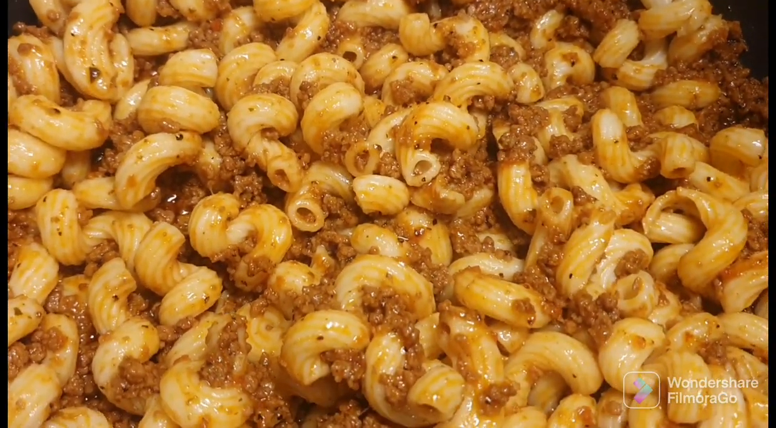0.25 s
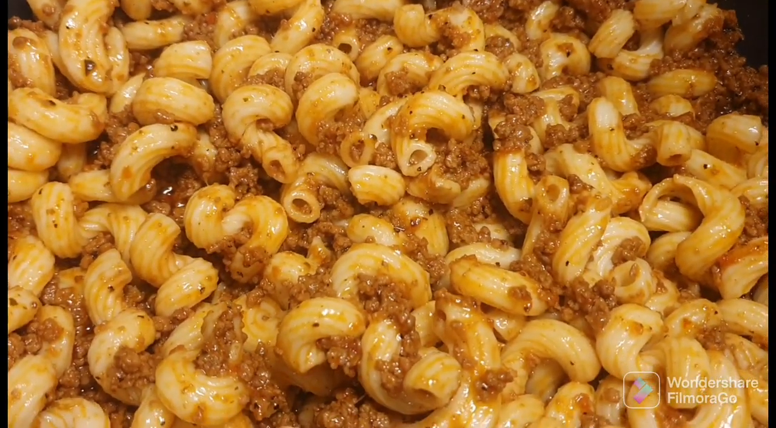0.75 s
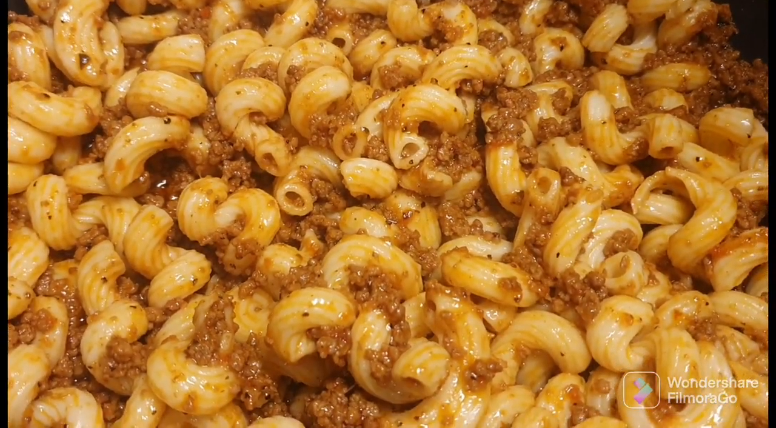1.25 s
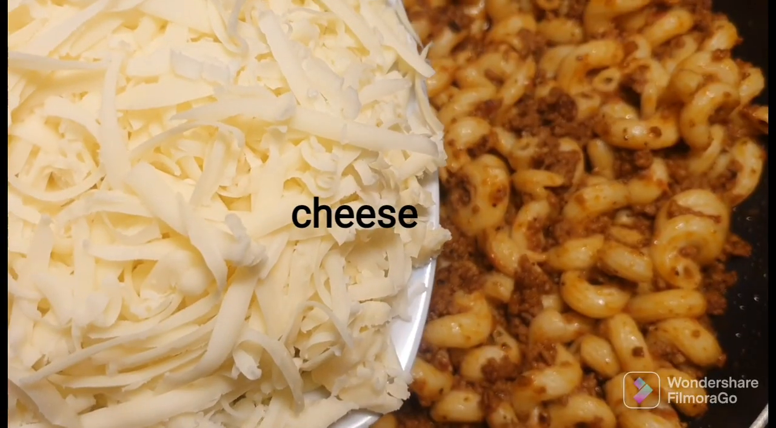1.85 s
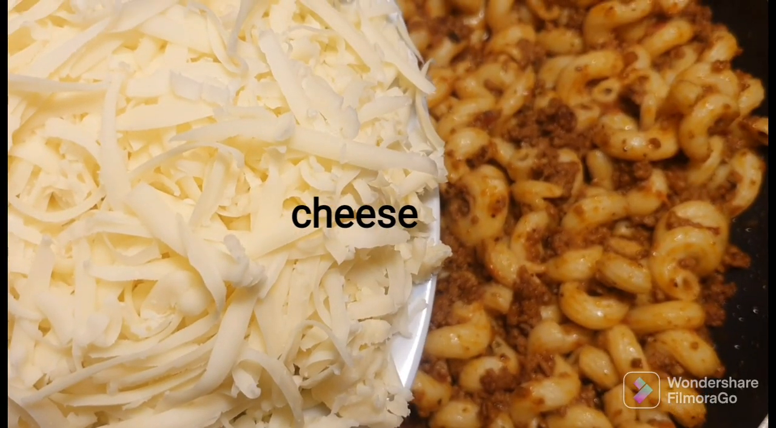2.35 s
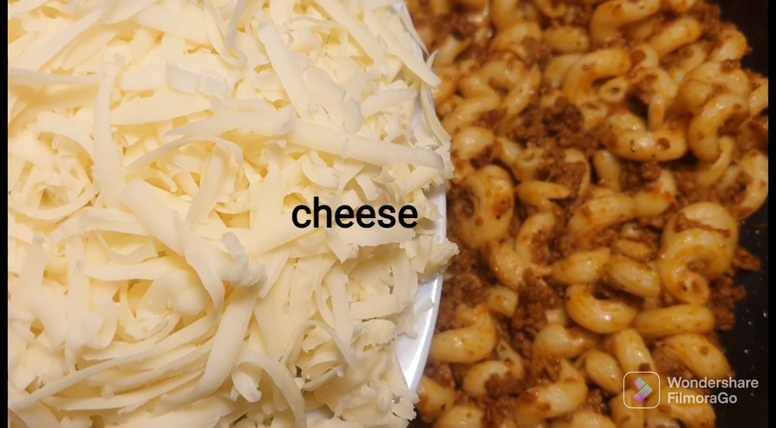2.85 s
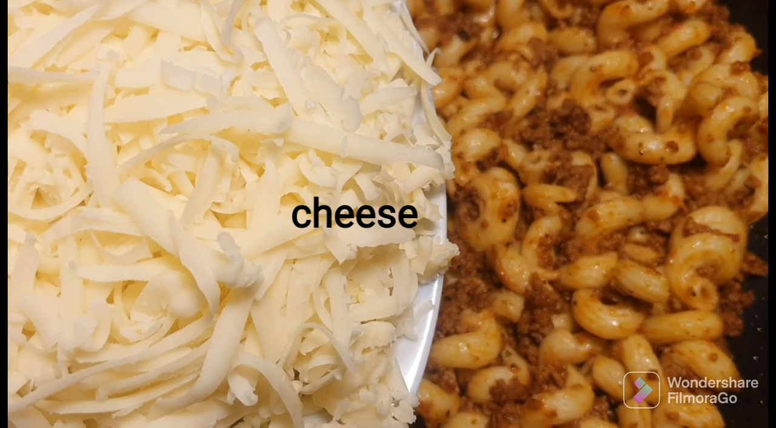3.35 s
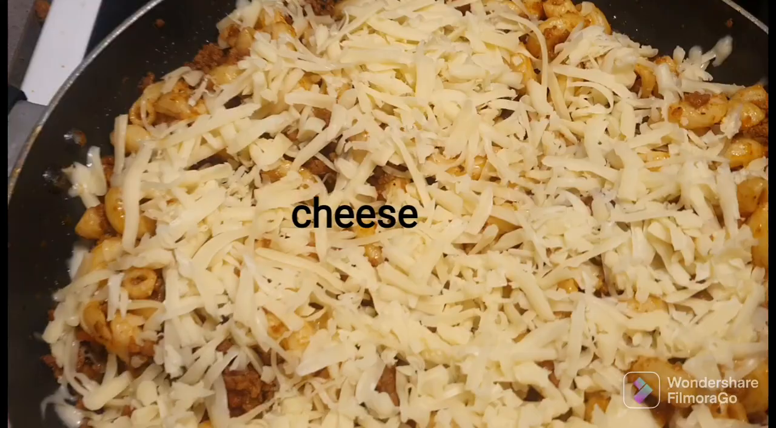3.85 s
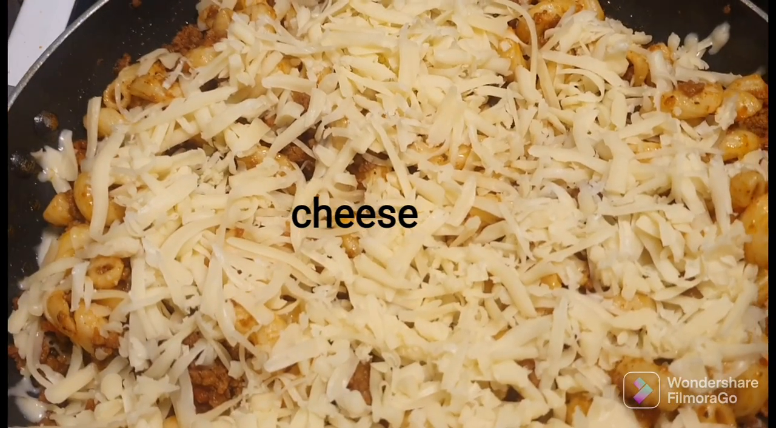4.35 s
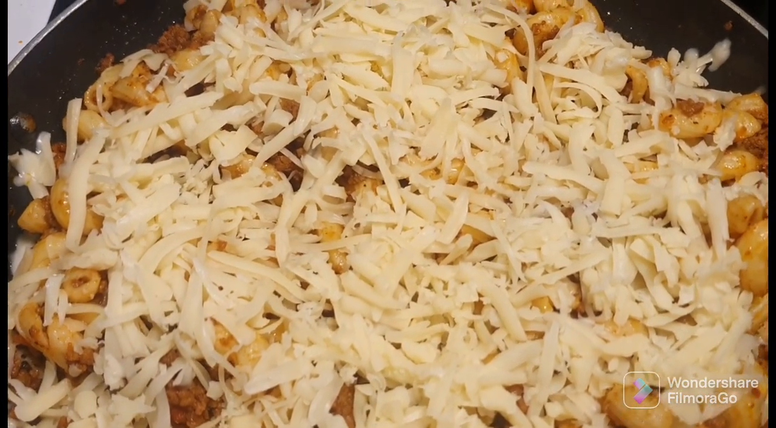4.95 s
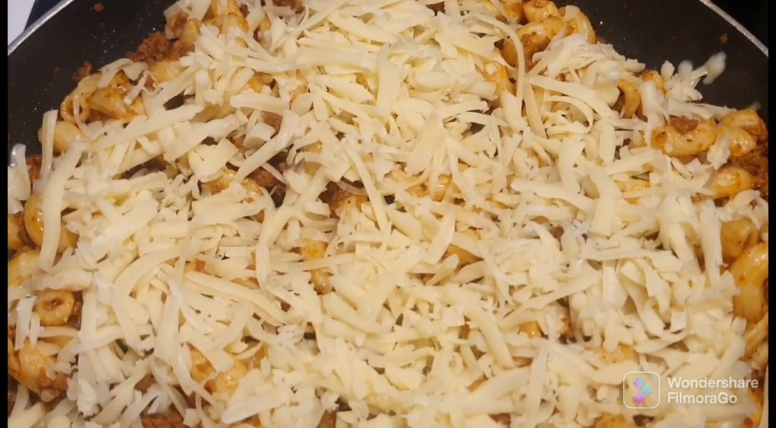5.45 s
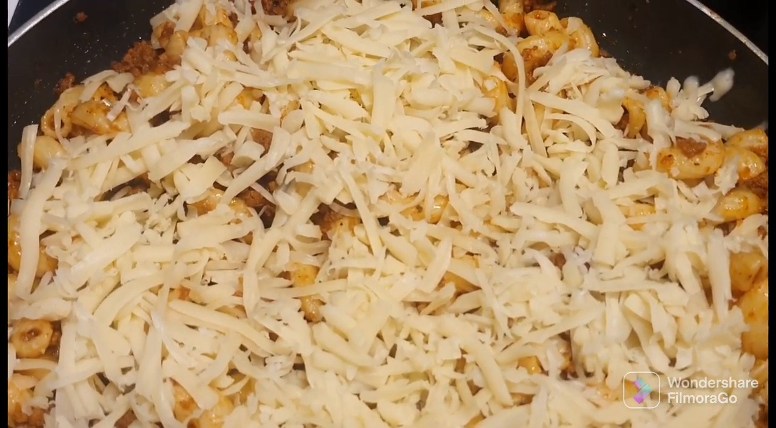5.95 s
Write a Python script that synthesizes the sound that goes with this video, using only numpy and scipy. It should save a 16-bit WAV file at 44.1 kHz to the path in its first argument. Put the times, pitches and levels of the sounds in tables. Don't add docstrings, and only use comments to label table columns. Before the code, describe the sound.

A soft, low traffic rumble with airy hiss continues throughout, with a barely noticeable slow bump about four times a second. A buzzy sparrow chirp sounds at 0.4 s and a fainter one at 0.9. From 1.3 to 2.3 s a bird whistles clear, nearly pure phrases: a low arch, a leap and fall, a short drop, a dip and return. It adds brief throbbing warbles at 2.4, 2.9 and 3.4 s. Falling sparrow chirps recur near 1.4, 2.0, 2.9, 3.5, 4.3, 5.4 and 6.0 s, ringing off outdoor walls. Nearby in a small room, a loud dry double knock hits a full, damped pan at 1.5 s, with a soft thump, then lighter clacks and scraping to 2.2 s. A tiny scuff comes at 4.2 s, a sharp clack at 4.65, and faint taps and a scrape around 5.6 to 6.0 s.

```python
import sys
import numpy as np
from scipy import signal
from scipy.io import wavfile

SR = 44100
rng = np.random.default_rng(int(sys.argv[2]) if len(sys.argv) > 2 else 0)


def wav_out(sig):
    wavfile.write(sys.argv[1], SR, np.round(np.clip(np.atleast_2d(sig).T, -1, 1) * 32767).astype(np.int16))


def ratio_of_db(decibels):
    return 10 ** (np.asarray(decibels, float) / 20)


N = 272979

# f/Hz, density level/dB
FLOOR_SPECTRUM = [(12, -30), (20, -11.5), (44, -3.5), (101, -8.5), (202, -6.5), (667, -15), (881, -16),
                  (2270, -23.5), (3960, -22), (4680, -25), (8640, -48.5), (10200, -49), (11400, -67),
                  (13500, -82), (15500, -74.5)]
# f/Hz, correlation/1
FLOOR_LIKENESS = [(30, 0.74), (180, 0.73), (550, 0.33), (1650, 0.057), (5000, 0.18), (12000, 0.18)]
# t/s, engine rumble level/dB, far chatter level/dB
FLOOR_SWELLS = [(0, 2.5, -9), (1.2, 3, -9.5), (1.598, 5, 2.5), (2.599, 5.5, -2.5), (3.8, 5, 1),
                (4.399, 3, -1), (5.199, 4.5, -2), (6.19, 3.5, -5)]
# start t/s, length/s, top f/Hz, end f/Hz, level/dB
CHIRPS = [(1.387, 0.091, 4514, 3200, -47.5), (2.014, .12, 4710, 3200, -48),
          (2.905, 0.087, 5000, 2917, -47.5), (3.539, 0.12, 4247, 3295, -47),
          (5.433, 0.087, 5000, 2936, -48), (6.038, 0.1, 4297, 2970, -48)]
# start t/s, length/s, top f/Hz, end f/Hz, level/dB
BROAD_CHIRPS = [
    (0.376, .082, 5360, 4380, -53),
    (0.858, .085, 4690, 4010, -64.5),
    (4.276, 0.091, 4904, 3856, -50.5),
]
# start t/s, length/s, from f/Hz, to f/Hz, level/dB
FAINT_CHIRPS = [(.17, .13, 4650, 3820, -77), (2.52, 0.058, 4290, 3260, -60), (2.7, 0.092, 3730, 3280, -63),
                (2.805, .03, 5520, 4350, -60), (3.15, 0.23, 3020, 3240, -72), (4.83, .035, 3330, 3490, -63),
                (4.945, 0.027, 4420, 4700, -65), (4.995, 0.054, 3610, 3450, -66),
                (5.29, 0.034, 4820, 4740, -72)]
# multiple/1, level/dB
CHIRP_OVERTONES = [(2, -30.5), (3, -38)]
# start t/s, length/s, from f/Hz, to f/Hz, level/dB
FAR_NOTES = [(1.04, 0.064, 1720, 1644, -64), (1.11, 0.024, 1860, 2050, -60), (1.135, 0.1, 2080, 2120, -55),
             (1.76, .045, 2340, 2750, -45), (1.495, 0.03, 1845, 1816, -44.5),
             (1.875, 0.049, 2750, 3100, -54.5), (3.0, .12, 546, 554, -63), (3.42, 0.33, 532, 518, -59.5),
             (3.83, .22, 1282, 1272, -72)]
# t/s, f/Hz, level/dB
WHISTLED_PHRASES = [
    [(1.268, 1720, -52.5), (1.3, 1834, -44.5), (1.32, 1920, -32.5), (1.35, 1964, -29.5), (1.378, 1981, -32),
     (1.41, 1941, -31.5), (1.435, 1868, -35), (1.495, 1770, -40.5)],
    [(1.655, 2090, -39), (1.672, 2610, -47), (1.69, 2757, -39.5), (1.72, 2574, -33), (1.745, 2370, -37.5),
     (1.765, 2223, -39.5)],
    [(1.885, 2010, -54), (1.905, 2115, -36), (1.94, 2094, -32.5), (1.952, 1805, -37), (1.962, 1610, -51)],
    [(2.04, 2585, -43), (2.115, 2510, -38), (2.14, 2470, -39.5), (2.165, 2370, -37), (2.213, 2070, -36),
     (2.225, 2180, -41), (2.25, 2431, -35.5), (2.285, 2603, -39), (2.33, 2520, -44)],
]
# multiple/1, level/dB
WHISTLE_OVERTONES = [(3, -37.5), (4, -45.5), (5, -46), (6, -55.5), (7, -60.5)]
# start t/s, last throb t/s, f/Hz, level/dB, throb period/s
WARBLED_NOTES = [
    (2.418, 2.523, 1942, -33, 0.025),
    (2.854, 2.944, 1940, -37, 0.0269),
    (3.376, 3.55, 1970, -35, 0.01904),
]
# t/s, f/Hz, level/dB
WARBLE_UPBEAT = [(3.305, 1732, -63), (3.325, 1745, -46.5), (3.345, 2290, -44.5), (3.375, 2600, -47),
                 (3.4, 2030, -28.5)]
# start t/s, length/s, from f/Hz, to f/Hz, level/dB
HOARSE_CHIPS = [(1.6, 0.03, 3215, 1880, -43.5), (2.25, 0.12, 1504, 1785, -56),
                (2.37, 0.047, 2750, 2920, -48.5), (2.815, 0.053, 2720, 2670, -52.5),
                (3.17, 0.1, 2210, 2100, -61), (3.62, 0.016, 2910, 2470, -51.5),
                (3.665, .015, 2810, 2370, -48.5), (3.715, 0.01, 2610, 2400, -43.5),
                (3.765, 0.016, 3090, 2720, -51), (4.078, 0.016, 3180, 2180, -47.5)]
# t/s, peak level/dB, brightness level/dB, left-right difference/dB
KNOCKS = [(1.526, -19.5, -18, 5), (1.549, -20, -47, 1), (1.608, -37, -43, 6.5), (1.737, -33.5, 5, 11),
          (1.964, -33, -26, 1.5), (2.055, -30.5, 3, -3), (2.079, -34, -38, 0.5), (2.139, -31, 7.5, -5.5),
          (2.195, -36.5, 0.5, -15.5), (2.464, -47, -18, 5.5), (3.358, -38, 5, 2), (4.174, -37, -73, -16),
          (4.221, -41, 4.5, -7), (4.607, -31, -3.5, 19), (4.651, -21.5, -9, 11), (4.67, -49, -33, 23),
          (4.718, -48, 10.5, -20), (4.797, -62, 23, 20), (5.601, -45, -50, 2), (5.954, -44.5, 5.5, 20),
          (6.046, -41.5, -2, -8)]
# peak t/s, level/dB, rise/s, fall/s
SCRAPE_STROKES = [(1.519, -22, 0.0036, .013), (1.529, -44.5, 0.011, 0.71), (1.743, -43, 0.016, 0.038),
                  (1.981, -50.5, 0.055, 0.014), (2.083, -37, 0.079, 0.2), (2.475, -42.5, 0.074, 0.082),
                  (4.18, -48.5, 0.053, 0.13), (4.603, -30, 0.0059, 0.07), (4.656, -37, 0.058, 0.12),
                  (4.75, -49, 0.065, 0.21), (5.526, -50.5, .006, 0.23), (5.979, -40, 0.091, 0.03),
                  (6.03, -49.5, 0.036, .22)]
# f/Hz, 60 dB decay time/s, level/dB
PAN_MODES = [(216, 0.071, -3), (324.6, 0.23, -3), (362.7, 0.066, -6), (537, 0.061, -4), (583, 0.024, 6.5),
             (708, 0.1, 15), (762, 0.016, -8), (1207, 0.012, 11.5), (1375, 0.015, -2.5)]
# f/Hz, density level/dB
PAN_BODY = [(88, -66), (150, -10.5), (336, 1.5), (449, -2.5), (571, -20), (987, -4), (1170, -17),
            (1710, -27), (1890, -10.5), (4860, -20.5), (9000, -63.5), (11700, -88), (19800, -120)]
# t/s, peak level/dB
WORKTOP_THUMPS = [
    (1.599, -43),
    (2.061, -45.5),
]
# start t/s, length/s, from f/Hz, to f/Hz, level/dB
THIN_NOTE = [(2.56, 0.0513, 4890, 4530, -59)]
# multiple/1, level/dB
THIN_OVERTONES = [(2, -13), (3, -31)]
# t/s, f/Hz, level/dB
FALLING_NOTE = [(3.79, 8830, -76), (3.88, 7920, -72), (3.97, 7400, -67), (4.0, 6550, -55.5),
                (4.015, 5810, -70), (4.027, 5000, -52), (4.06, 2300, -74)]
# start t/s, length/s, from f/Hz, to f/Hz, level/dB
RISING_WHISPER = [(3.8, 0.26, 10950, 13600, -86)]


def rms_one(x):
    return x / np.sqrt(np.mean(x ** 2) + 1e-20)


def at_hz(points, hz):
    table_hz, value = np.array(points)[:, :2].T
    return np.interp(np.log(hz), np.log(table_hz), value)


def band(x, low_hz, high_hz):
    return signal.sosfilt(signal.butter(2, [low_hz, high_hz], "band", fs=SR, output="sos"), x)


def coloured(x, spectrum):
    edges = 100 * 2 ** np.arange(0, 7, .5)
    out = 0
    for k, (low, high) in enumerate(zip(edges, edges[1:])):
        out = out + ratio_of_db(at_hz(spectrum, np.sqrt(low * high))) * band(x, low, high) * (-1) ** k
    return out


def drift(rate_hz):
    r = np.exp(-2 * np.pi * rate_hz / SR)
    return rms_one(signal.lfilter([1], [1, -2 * r, r * r], rng.standard_normal(N + SR))[SR:])


def stereo(mid, side, alike):
    return np.sqrt(1 + alike) * mid + np.sqrt(1 - alike) * side * [[1], [-1]]


def add(out, s, sound, pan_db):
    i = int(s * SR)
    placed = sound * ratio_of_db(np.array([[.5], [-.5]]) * pan_db)
    out[:, i:i + len(sound)] += placed[:, :N - i]


def echoes(x, t60, gap_s, alike):
    t = np.arange(SR) / SR
    mid, side = rng.standard_normal((2, SR)) * ratio_of_db(-60 * t / t60) * (t > gap_s)
    tail = stereo(mid, side, alike)
    tail = tail / np.sqrt(np.sum(tail ** 2) / 2)
    return signal.fftconvolve(x.mean(axis=0)[None], tail, axes=1)[:, :N]


def sung(curves, shake, pan_db, shake_per_khz=0):
    return [[(s, hz, db, pan_db, shake + shake_per_khz * max(hz / 1000 - 2, 0)) for s, hz, db in curve]
            for curve in curves]


def glides(rows, shake, pan_db):
    edge_db = -5
    curves = []
    for s, length_s, from_hz, to_hz, db in rows:
        middle = (s + length_s / 2, (from_hz + to_hz) / 2, db)
        curves.append([(s, from_hz, db + edge_db), middle, (s + length_s, to_hz, db + edge_db)])
    return sung(curves, shake, pan_db)


def whistles(notes, overtones, warble_hz=90):
    out, unsteady = np.zeros((2, N)), drift(warble_hz)
    for note in notes:
        s, *columns = np.transpose(note)
        t = np.arange(s[0], s[-1], 1 / SR)
        hz, db, pan_db, shake = (np.interp(t, s, column) for column in columns)
        shaken_hz = hz * (1 + shake * unsteady[int(s[0] * SR):][:len(t)])
        phase = 2 * np.pi * np.cumsum(shaken_hz) / SR
        tone = np.sin(phase)
        for k, level_db in overtones:
            audible = (k * hz < SR / 2) * np.clip(k * hz / 2000 - 3, 0, 1)
            tone = tone + ratio_of_db(level_db) * np.sin(k * phase) * audible
        edges = np.clip(np.minimum(t - s[0], s[-1] - t) / 0.0028, 0, 1)
        add(out, s[0], np.sqrt(2) * tone * edges * ratio_of_db(db), pan_db)
    return out


def traffic_and_air():
    level_db, patchy_db = -51, 1.92
    out, together, edges = 0, drift(1.5), 20 * 2 ** np.arange(0, 10, .4)
    white, flicker = rng.standard_normal((2, 2, N)), drift(12.4)
    s, rumble_db, chatter_db = np.transpose(FLOOR_SWELLS)
    t = np.arange(N) / SR
    rumble_db, chatter_db = np.interp(t, s, rumble_db), np.interp(t, s, chatter_db)
    for k, (low, high) in enumerate(zip(edges, edges[1:])):
        mid, side = band(white[k % 2], low, high)
        hz = np.sqrt(low * high)
        alike = np.clip(at_hz(FLOOR_LIKENESS, hz), 0, 1)
        swell_db = rumble_db * (55 < hz < 125) + chatter_db * (1400 < hz < 7500)
        patch_db = patchy_db * (together / 2 + np.roll(flicker, 9973 * k))
        gain = ratio_of_db(at_hz(FLOOR_SPECTRUM, hz) + swell_db + patch_db)
        out = out + gain * stereo(mid, side, alike)
    return ratio_of_db(level_db) * rms_one(out)


def offset_bump():
    first_s, every_s, half_s, level_db = .169, .256, 0.026, -38
    since = (np.arange(N) / SR - first_s + every_s / 2) % every_s - every_s / 2
    pulse = np.clip(1 - np.abs(since) / half_s, 0, 1)
    pole = np.exp(-2 * np.pi * 0.38 / SR)
    return ratio_of_db(level_db) * signal.lfilter([1, -1], [1, -pole], pulse - pulse.mean())


def chirp(s, length_s, top_hz, end_hz, db, zigzag):
    step_hold, bend, zigzag_s = .9, .85, .027
    fade_db, step_dip_db, high_loss_db_per_khz = -6.5, -1, -2.5
    u = np.linspace(0, 1, 60)
    step = np.clip(3 * u - .5, 0, 2)
    sunk = (step - step_hold * np.sin(2 * np.pi * step) / (2 * np.pi)) / 2
    dip = 1 - zigzag * np.sin(np.pi * u * length_s / zigzag_s) ** 2
    hz = top_hz * (end_hz / top_hz) ** (sunk ** bend) * dip
    db = db + fade_db * u + step_dip_db * np.sin(np.pi * step) ** 2
    db = db + high_loss_db_per_khz * (hz - end_hz) / 1000
    return np.transpose([s + u * length_s, hz, db])


def sparrows():
    buzz_hz, buzz_depth, rough = 197.4, 1.0, 0.0466
    lead_s, swing_s = 0.023, .02
    buzz = np.cos(2 * np.pi * np.cumsum(buzz_hz * (1 + 0.21 * drift(40))) / SR)
    curves = [chirp(*row, zigzag=0.0292) for row in CHIRPS]
    curves += [chirp(*row, zigzag=.28) for row in BROAD_CHIRPS]
    leads = [(s - lead_s, lead_s, 5810, 5000, db - 10) for s, _, _, _, db in CHIRPS + BROAD_CHIRPS]
    swings = [(s - swing_s, swing_s, 3200, top_hz, db - 8) for s, _, top_hz, _, db in BROAD_CHIRPS]
    notes = sung(curves, rough, 0) + glides(FAINT_CHIRPS + swings, rough, 0) + glides(leads, .11, 0)
    return whistles(notes, CHIRP_OVERTONES, warble_hz=244) * (1 + buzz_depth * buzz)


def warbles(pan_db):
    scoop, rise_s, fall_s = 0.022, 0.03, 0.016
    soft_db, end_db, swell_db_per_s = -9.5, -22.5, 22.5
    rough, clear, throb_depth = 0.075, 0.019, 0.54
    notes = []
    for s, last_s, hz, db, period_s in WARBLED_NOTES:
        t = np.arange(s, last_s + fall_s, .002)
        early = np.clip(1 - (t - s) / rise_s, 0, 1)
        late = np.clip((t - last_s) / fall_s, 0, 1)
        throb_db = 20 * np.log10(1 + throb_depth * np.cos(2 * np.pi * (t - last_s) / period_s))
        note_db = db + throb_db + swell_db_per_s * (t - last_s) + soft_db * early + end_db * late
        note_hz = hz * (1 - scoop * (early + late))
        notes.append(np.transpose([t, note_hz, note_db, pan_db + 0 * t, clear + (rough - clear) * early]))
    return notes


def whistling_birds():
    pan_db, far_pan_db = 6, 5
    phrases = sung(WHISTLED_PHRASES, 0.0019, pan_db, shake_per_khz=0.033)
    hoarse = glides(FAR_NOTES, 0.017, far_pan_db) + glides(HOARSE_CHIPS, 0.055, far_pan_db)
    hoarse += sung([WARBLE_UPBEAT], 0.065, pan_db)
    return whistles(phrases + warbles(pan_db), WHISTLE_OVERTONES) + whistles(hoarse, [], warble_hz=197)


def pan():
    contact_s, grains_per_s = 0.02, 3300
    low, high, t = np.zeros((2, N)), np.zeros((2, N)), np.arange(N) / SR
    fade = np.exp(-t[:3000] / contact_s) * (1 - np.exp(-t[:3000] / 0.0011))
    for s, db, bright_db, pan_db in KNOCKS:
        crunch = fade * rng.standard_normal(3000)
        add(low, s, ratio_of_db(db + 4.0) * crunch, pan_db)
        add(high, s, ratio_of_db(db + bright_db - 4.5) * crunch, pan_db)
    stroke = 0
    for s, db, rise_s, fall_s in SCRAPE_STROKES:
        stroke = stroke + ratio_of_db(db) * np.interp(t, [s - rise_s, s, s + fall_s], [0, 1, 0])
    grains = (rng.random(N) < grains_per_s / SR) * rng.standard_normal(N)
    grains = grains * ratio_of_db(4.2 * np.minimum(rng.exponential(1, N), 3))
    low += ratio_of_db(10) * stroke * rms_one(grains)
    landing = drift(34)
    out = ratio_of_db(-5) * low
    for k, (hz, t60, db) in enumerate(PAN_MODES):
        r, w = ratio_of_db(-60 / (t60 * SR)), 2 * np.pi * hz / SR
        struck = low * ratio_of_db(4.1 * np.roll(landing, 7919 * k))
        resonator = [(1 - r * r) / 2, 0, (r * r - 1) / 2], [1, -2 * r * np.cos(w), r * r]
        ring = signal.lfilter(*resonator, struck + 1e-18)
        out += ratio_of_db(db) * ring * [[1], [(-1) ** (k * (hz > 450))]]
    return band(coloured(out, PAN_BODY), 190, 15000) + band(high, 1620, 3590) + ratio_of_db(-44.0) * high


def worktop():
    boom_hz, rise_s = 98.4, .025
    out, t = np.zeros((2, N)), np.arange(SR // 4) / SR
    boom = t / rise_s * np.exp(1 - t / rise_s) * np.sin(2 * np.pi * boom_hz * t)
    for s, db in WORKTOP_THUMPS:
        add(out, s - rise_s, ratio_of_db(db) * boom, 2.0)
    return out


def thin_birds():
    steady = whistles(glides(THIN_NOTE, 0.017, 19), THIN_OVERTONES)
    return steady + whistles(sung([FALLING_NOTE], 0.022, 0), [(2, -23.5), (3, -39)])


def whisper():
    note = whistles(glides(RISING_WHISPER, 0.0075, 0), [])
    return note + ratio_of_db(3.0) * echoes(note, t60=0.092, gap_s=0.0024, alike=.4)


def scuff():
    start_s, length_s, level_db, rise_s, cut_s = 4.22, .021, -39.5, .008, 0.0041
    since = np.arange(N) / SR - start_s
    before, after = np.clip(-since / rise_s, 0, None), np.clip((since - length_s) / cut_s, 0, None)
    rub = rng.standard_normal((2, N)) + rng.standard_normal(N)
    level = ratio_of_db(np.maximum(level_db - 30 * (before + after), -200))
    return level * (band(rub, 1370, 3800) + ratio_of_db(-32) * rub)


def yard():
    chirps = sparrows() + thin_birds()
    song = whistling_birds()
    out = ratio_of_db(0.5) * song
    out += ratio_of_db(-5.0) * echoes(song, t60=0.093, gap_s=0.0038, alike=0.57)
    out += ratio_of_db(-6) * echoes(song, t60=0.81, gap_s=0.025, alike=0.5)
    out += chirps
    out += ratio_of_db(5.5) * echoes(chirps, t60=0.34, gap_s=0.00067, alike=0.3)
    out += ratio_of_db(1.0) * echoes(chirps, t60=0.74, gap_s=0.0069, alike=0.62)
    deaf = signal.butter(3, [10900, 13200], "bandstop", fs=SR, output="sos")
    return signal.sosfilt(deaf, out) + whisper()


def scene():
    background, birds, near = traffic_and_air(), yard(), pan()
    room = ratio_of_db(1.5) * echoes(near, t60=0.33, gap_s=0.0042, alike=0.11)
    return background + birds + near + room + worktop() + scuff()


def band_limit(x):
    return signal.sosfilt(signal.butter(12, 15720, fs=SR, output="sos"), x)


def record(dry):
    lifted = dry + ratio_of_db(7.5) * band(dry, 13700, 17100)
    return band_limit(lifted + offset_bump())


dry = scene()
out = record(dry)
wav_out(out)
```